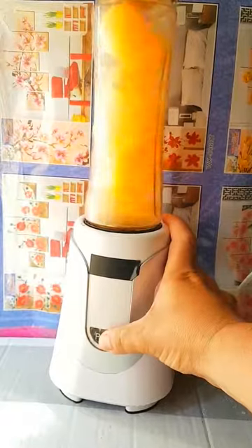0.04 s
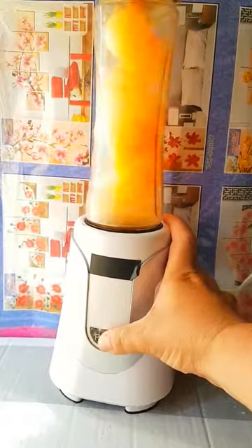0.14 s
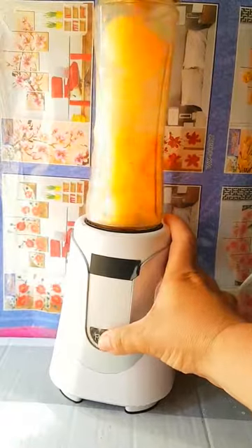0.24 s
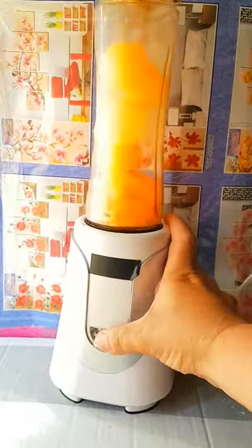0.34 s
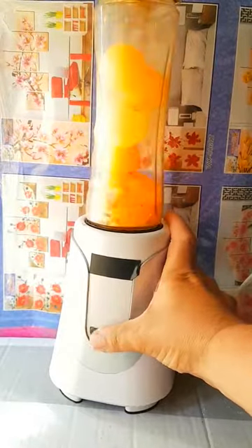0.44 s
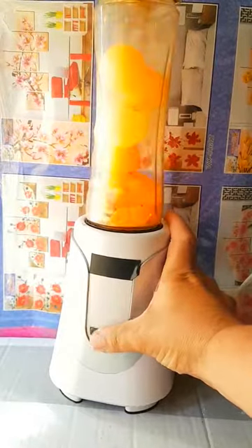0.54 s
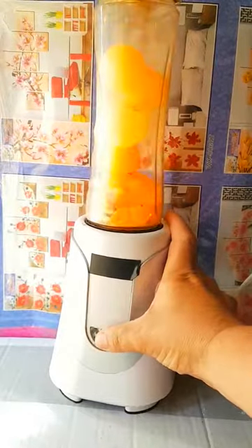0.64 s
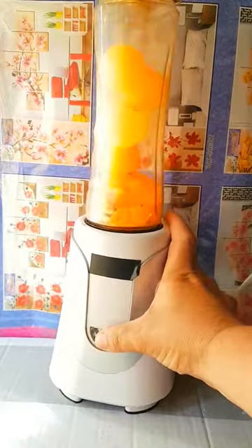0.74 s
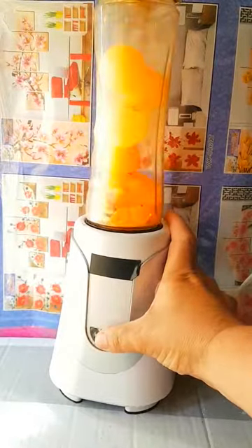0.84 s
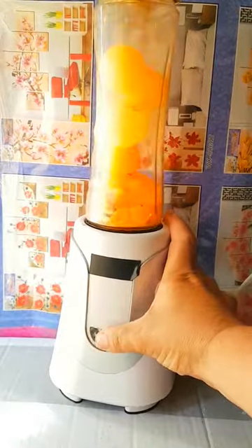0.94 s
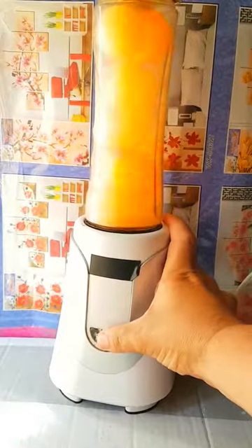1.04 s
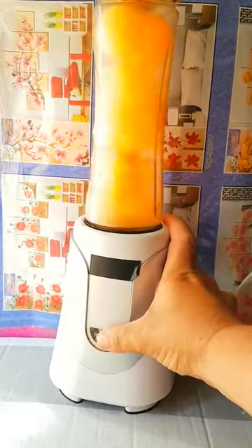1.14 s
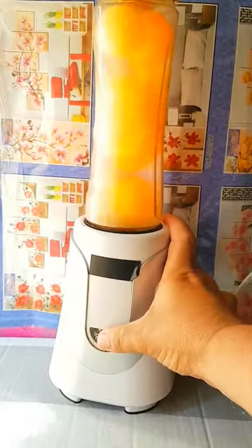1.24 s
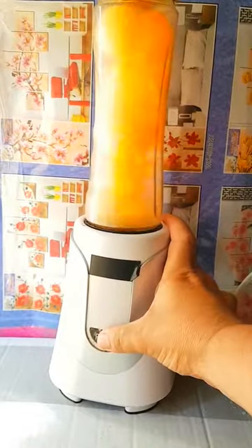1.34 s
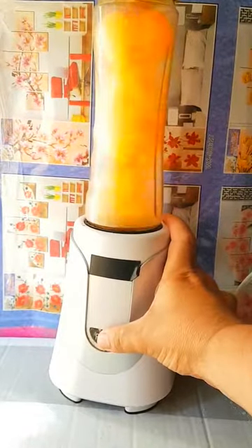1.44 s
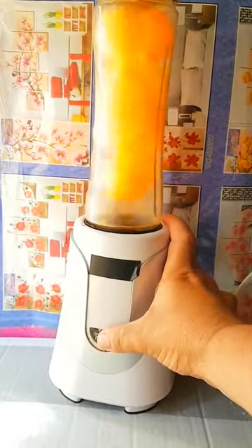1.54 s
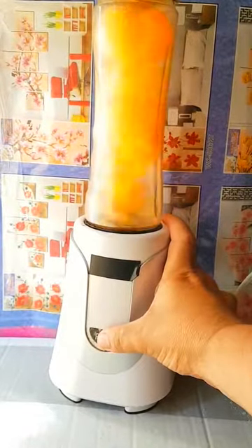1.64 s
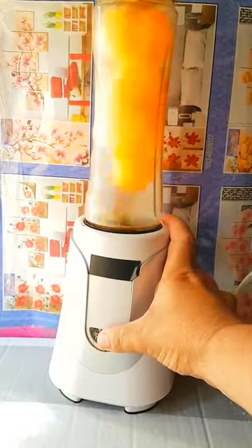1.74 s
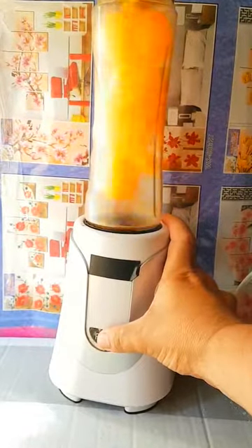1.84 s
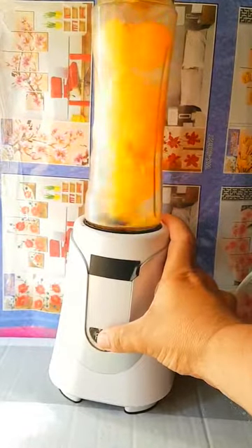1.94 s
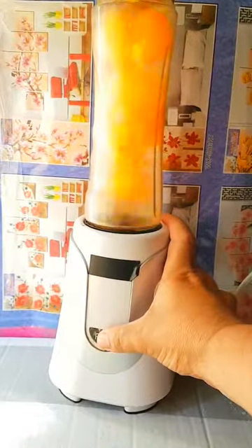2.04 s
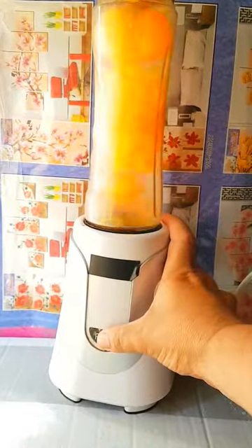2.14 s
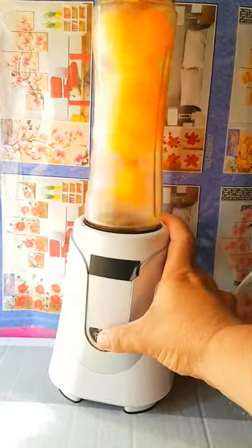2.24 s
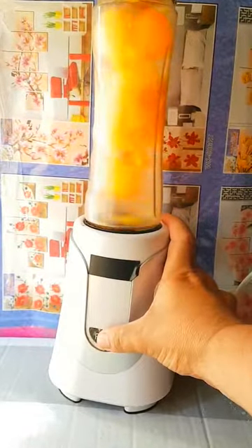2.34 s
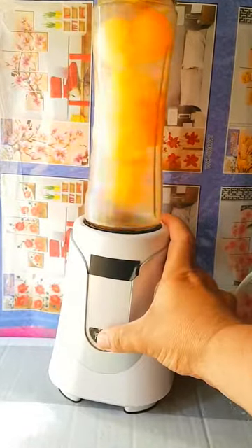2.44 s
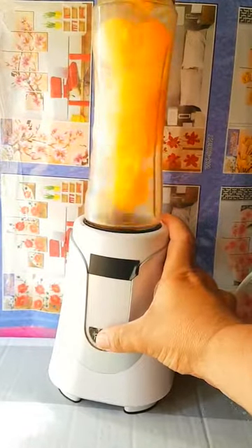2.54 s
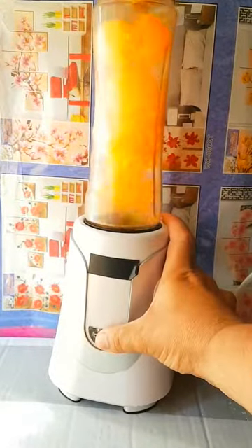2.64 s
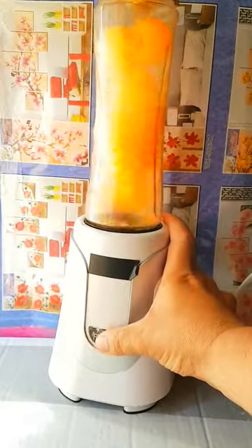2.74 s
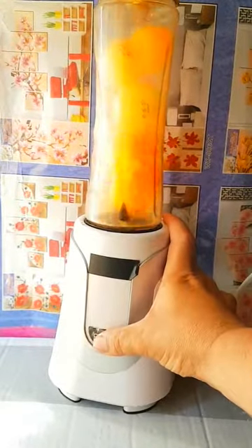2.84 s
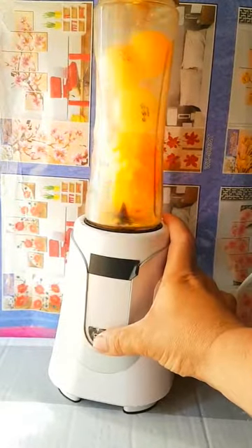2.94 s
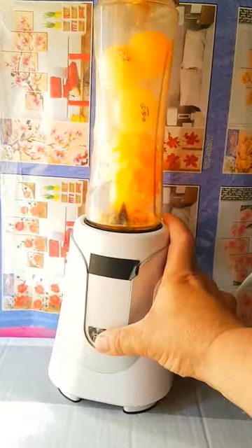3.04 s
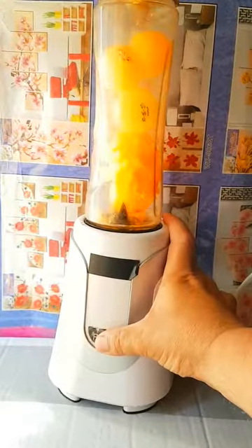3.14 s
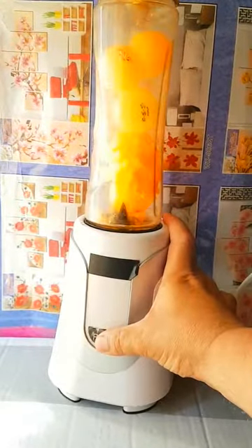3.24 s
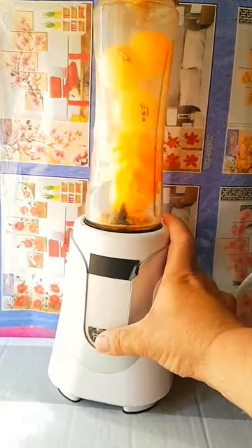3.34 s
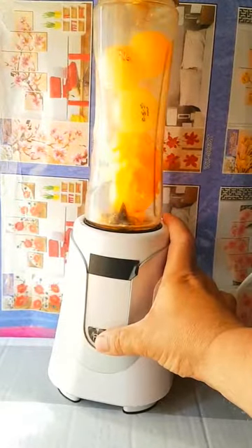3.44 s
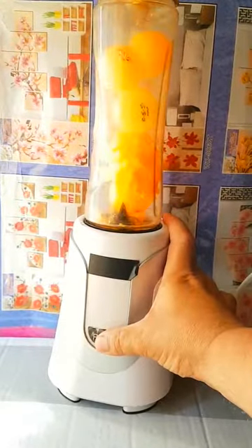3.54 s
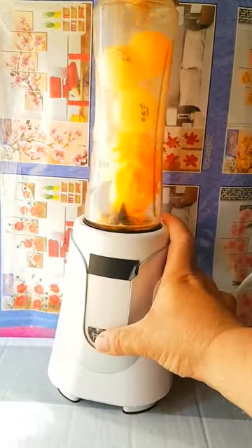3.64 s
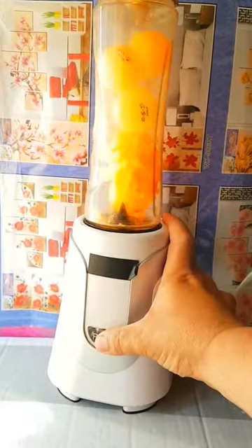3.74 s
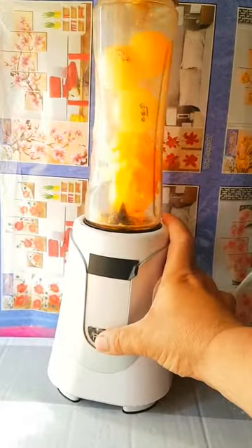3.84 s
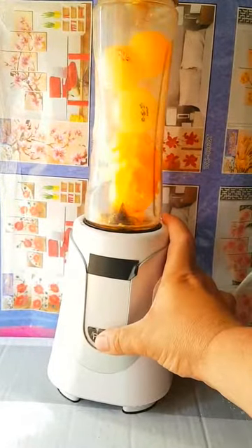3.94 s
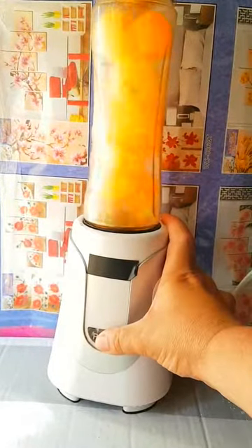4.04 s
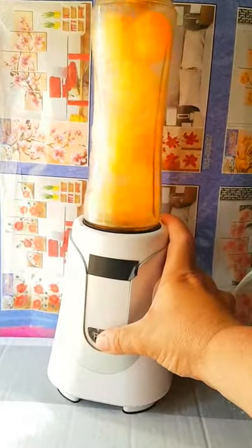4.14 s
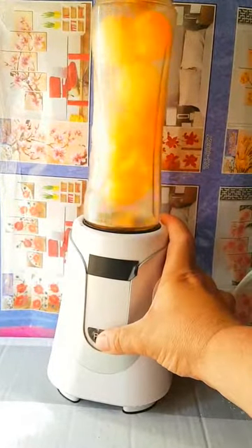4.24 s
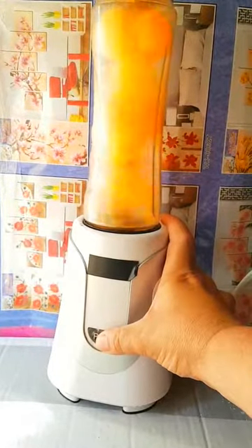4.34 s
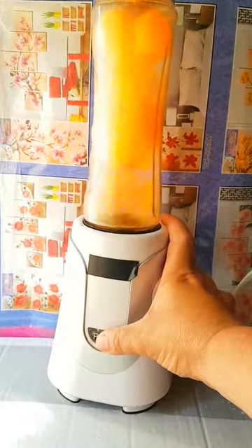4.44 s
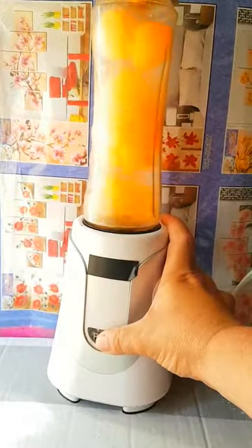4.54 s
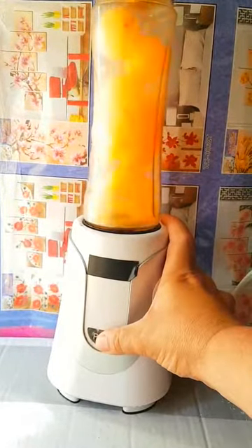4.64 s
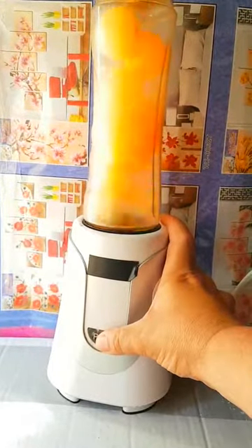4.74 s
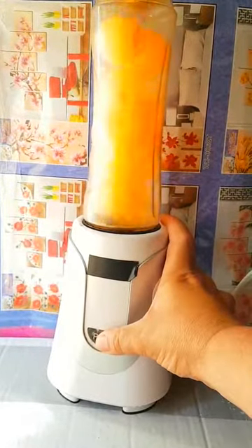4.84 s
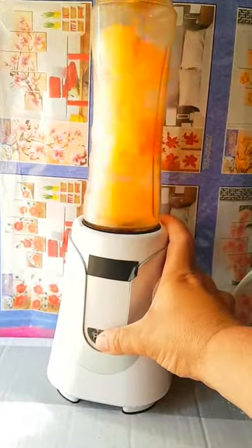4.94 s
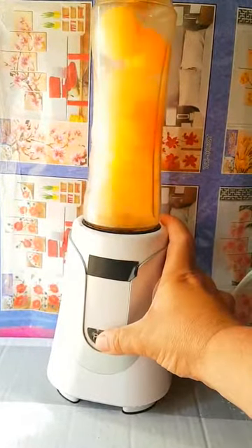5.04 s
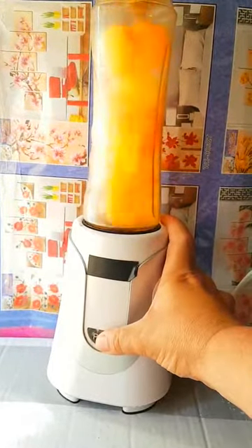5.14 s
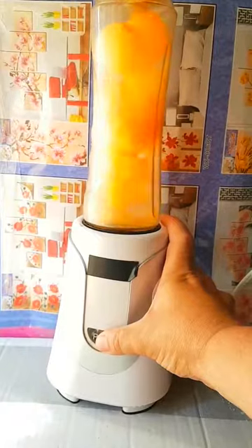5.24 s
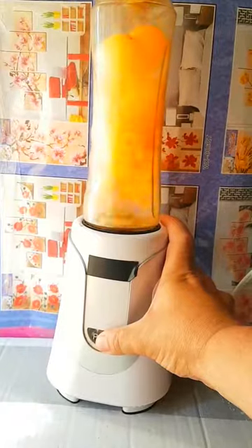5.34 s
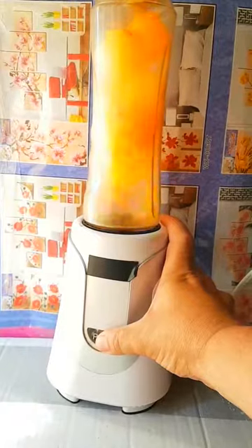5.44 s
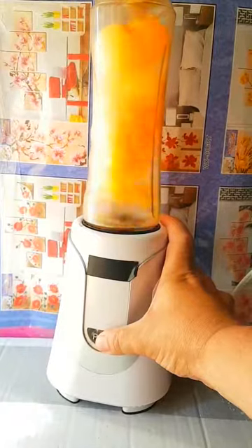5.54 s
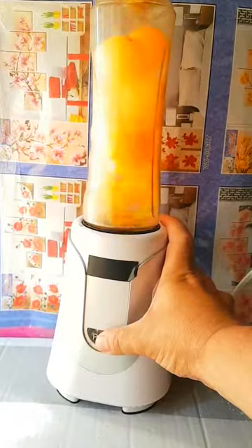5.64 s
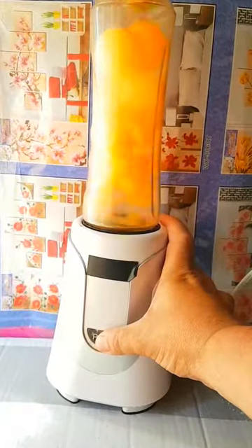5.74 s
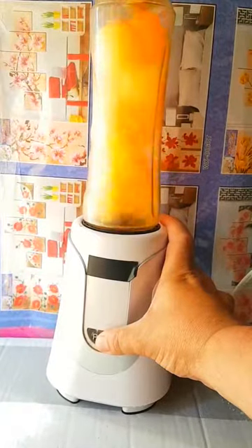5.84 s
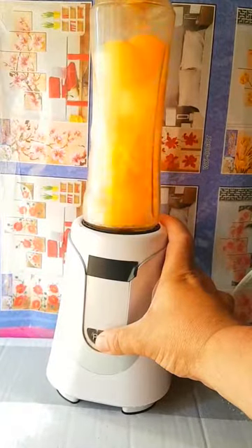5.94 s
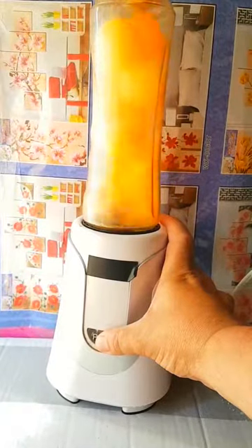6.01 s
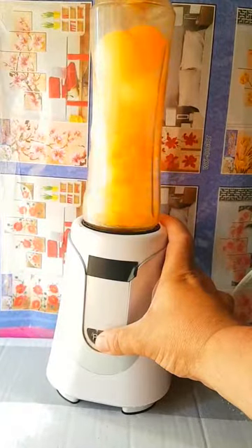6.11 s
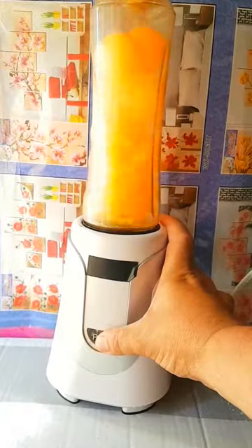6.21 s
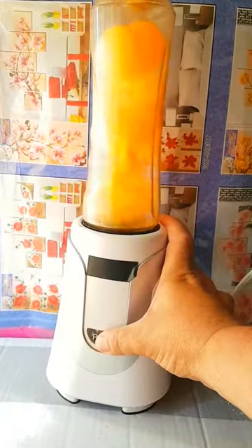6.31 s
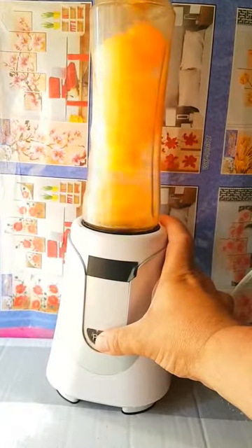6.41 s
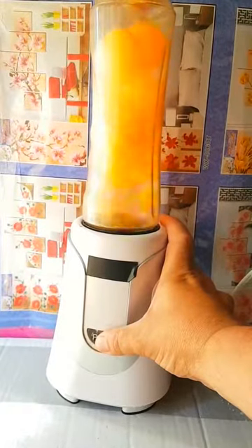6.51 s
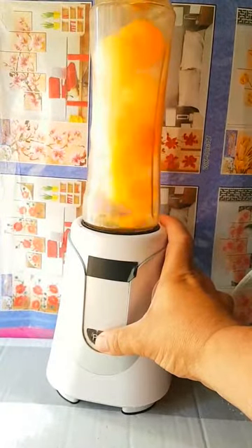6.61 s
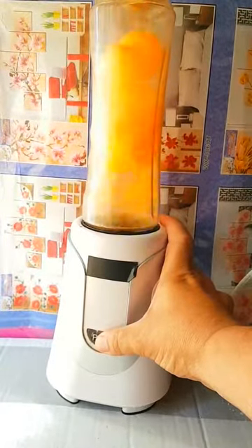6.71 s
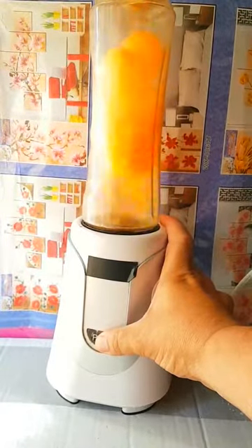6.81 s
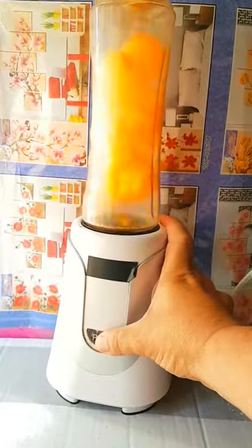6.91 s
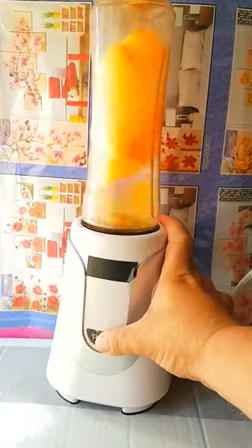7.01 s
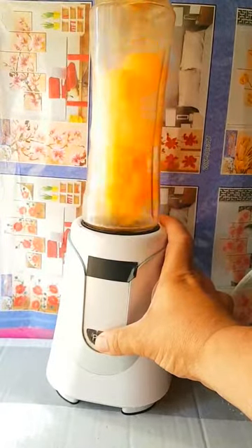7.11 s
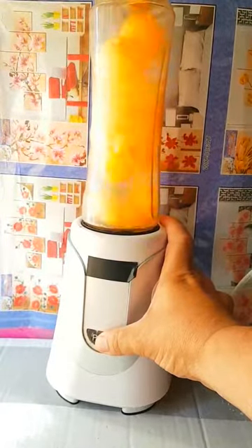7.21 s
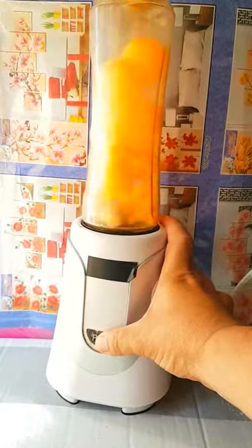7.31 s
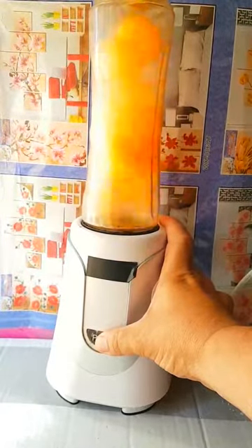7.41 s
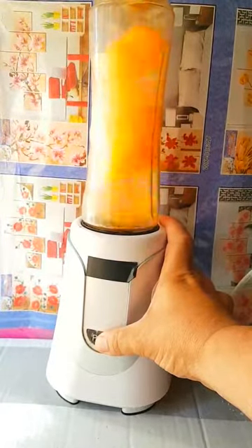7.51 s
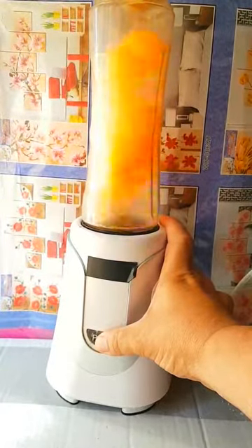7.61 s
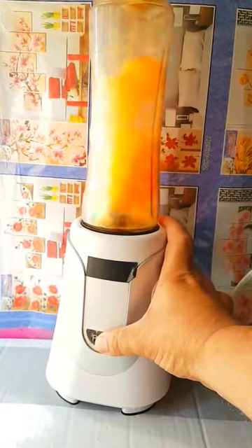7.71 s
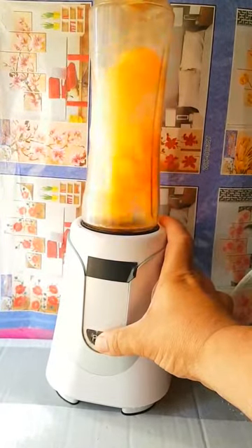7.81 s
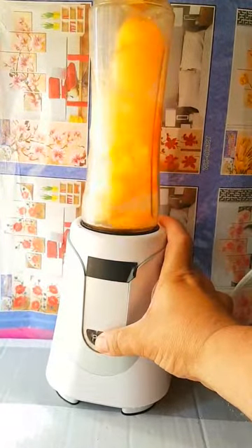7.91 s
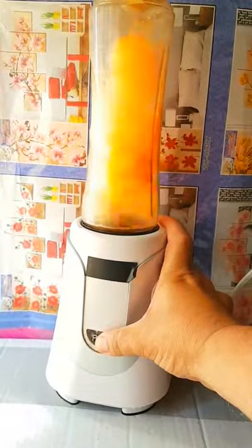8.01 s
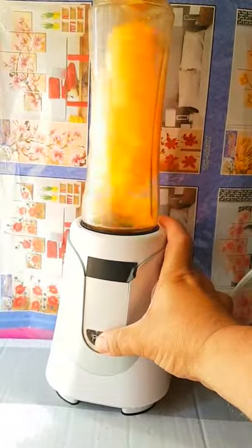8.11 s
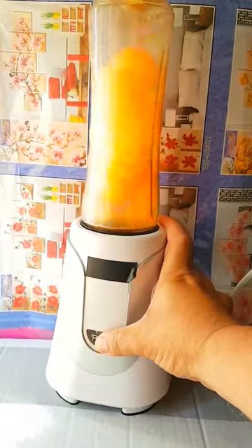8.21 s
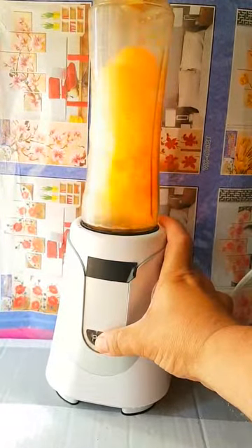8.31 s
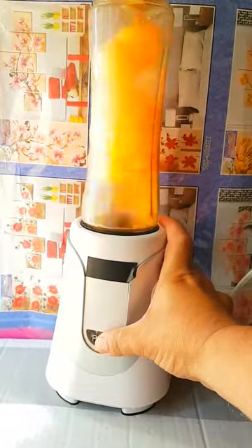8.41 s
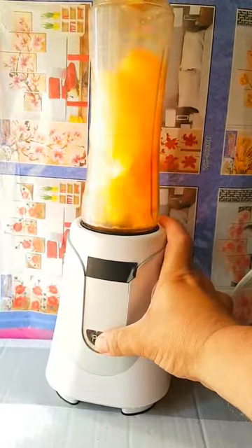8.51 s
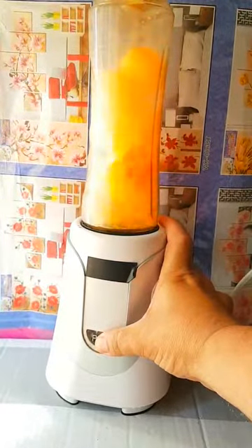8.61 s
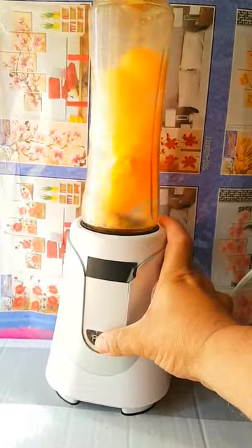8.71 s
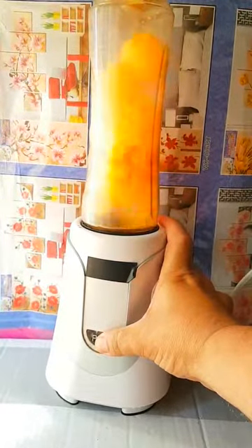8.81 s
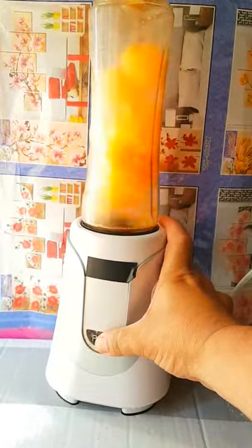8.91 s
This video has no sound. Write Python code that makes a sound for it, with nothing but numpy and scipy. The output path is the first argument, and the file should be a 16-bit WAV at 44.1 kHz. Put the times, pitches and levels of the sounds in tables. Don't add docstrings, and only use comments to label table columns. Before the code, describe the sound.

Hard plastic balls clatter loudly in a small motor-driven jar, stopping almost at once, then returning in longer, nearly unbroken rattling runs.

```python
import sys
import numpy as np
from scipy import signal
from scipy.fft import rfft, irfft
from scipy.io import wavfile
from scipy.ndimage import uniform_filter1d

SR = 44100
rng = np.random.default_rng(int(sys.argv[2]) if len(sys.argv) > 2 else 0)


def waveform_to_disk(signal):
    frames = np.transpose(np.atleast_2d(signal))
    scaled = np.clip(frames, -1, 1) * 32767
    samples = np.round(scaled).astype(np.int16)
    wavfile.write(sys.argv[1], SR, samples)


def boost_factor(decibels):
    exponent = np.asarray(decibels, float) / 20
    return 10 ** exponent


N = 395136


def ring(x, hz, width_hz):
    return signal.lfilter(*signal.iirpeak(hz, hz / width_hz, fs=SR), x)


def butter(x, order, hz, kind="low"):
    return signal.sosfilt(signal.butter(order, hz, kind, fs=SR, output="sos"), x)


def colour(x, points, unit=True):
    hz, db = np.transpose(points)
    bins_hz = np.fft.rfftfreq(4096, 1 / SR)
    gain = boost_factor(np.interp(np.log(bins_hz + 1), np.log(hz), db))
    if unit:
        gain = gain / np.sqrt(np.mean(gain ** 2))
    cepstrum = irfft(np.log(gain))
    cepstrum[1:2048] *= 2
    cepstrum[2049:] = 0
    response = irfft(np.exp(rfft(cepstrum)))
    return signal.oaconvolve(x, response[None], axes=1)[:, :N]


def train(s, size):
    at = np.clip((s * SR).astype(int), 0, N - 1)
    return np.array([np.bincount(at, channel, N) for channel in size])


def fade(x, t60_s):
    return signal.lfilter([1], [1, -np.exp(-np.log(1000) / (t60_s * SR))], x)


def swell(t, start, end, rise_db_s, sag_db_s, fall_db_s):
    t, start, end = t[None], start[:, None], end[:, None]
    rise = rise_db_s * np.maximum(start - t, 0)
    sag = sag_db_s * np.clip(t - start, 0, end - start)
    fall = fall_db_s * np.maximum(t - end, 0)
    return -rise - sag - fall


# on in seconds, off in seconds, idle rattle in dB.
RUNS = [
    (0, 0.226, -22),
    (1.087, 2.802, -42.5),
    (4.413, 5.42, -24),
    (5.424, 7.38, -24.5),
    (7.405, 8.953, -25.5),
]
# start in
# seconds, length in seconds, level in dB, share of the jar's air mode in dB.
THROWS = [(0, 0.22, -15.5, -9), (0.279, 0.038, -29, -12), (0.405, 0.15, -61.5, -9),
          (0.588, 0.0085, -62.5, -3.5), (1.084, 0.011, -21, -17.5), (1.109, 0.22, -11, -14),
          (1.307, 0.35, -11, -9), (1.713, 0.027, -28.5, -15.5), (1.746, 0.084, -14.5, -9.5),
          (1.91, 0.19, -28, -17.5), (2.12, 0.044, -11.5, -10.5), (2.252, 0.25, -14, -9),
          (2.558, 0.031, -18, -10), (2.678, 0.071, -14.5, -11), (2.831, 0.033, -30.5, -18),
          (2.953, 0.18, -62, -23),
          (4.082, 0.018, -27, -15), (4.102, 0.088, -13.5, -18.5), (4.186, 0.13, -11.5, -9),
               (4.438, .3, -11.5, -20.5), (4.824, 0.034, -10.5, -14), (4.977, .04, -28, -34),
               (5.063, 0.11, -13, -18), (5.283, 0.097, -17.5, -18.5), (5.421, 0.2, -15.5, -17.5),
               (5.764, 0.054, -28, -11), (5.855, 0.045, -22.5, -12), (5.923, 0.027, -17.5, -7),
               (6.052, 0.18, -19.5, -15), (6.25, 0.1, -20.5, -20), (6.449, 0.14, -15, -11.5),
               (6.664, 0.025, -11.5, -15), (6.758, 0.21, -14, -19.5), (7.051, 0.056, -16.5, -18),
               (7.247, 0.17, -24, -32), (7.477, 0.24, -14.5, -18), (7.977, 0.015, -23, -17),
               (8.057, 0.036, -19, -17), (8.146, 0.018, -17.5, -4), (8.328, 0.019, -18.5, -18),
               (8.437, 0.074, -19, -20), (8.646, 0.017, -20.5, -17), (8.748, 0.022, -21.5, -22),
               (8.87, 0.026, -23.5, -12), (8.926, .04, -19, -25)]
RISE_DB_S, SAG_DB_S, FALL_DB_S, COAST_DB_S = 4000, 15, 297.5, 167
IDLE_AIR_DB = -13.5


def churn(s):
    start, length, db, air_db = np.transpose(THROWS)
    throw_db = db[:, None] + swell(s, start, start + length, RISE_DB_S, SAG_DB_S, FALL_DB_S)
    throws = boost_factor(2 * throw_db)
    on, off, run_db = np.transpose(RUNS)
    idle_db = run_db[:, None] + swell(s, on, off, RISE_DB_S, 0, COAST_DB_S)
    idle = boost_factor(2 * idle_db).sum(axis=0)
    power = throws.sum(axis=0) + idle + 1e-30
    return 10 * np.log10(power), (air_db @ throws + IDLE_AIR_DB * idle) / power


# start in seconds,
# peak in dB, treble share in dB.
BLOWS = [(0.053, -12, -13), (0.089, -17, -15.5), (0.141, -15.5, -10.5), (1.089, -3.5, -19),
         (1.112, -10, -10), (1.293, -3, -13), (1.369, -4, -24), (1.435, -15, -20), (1.463, -5.5, -28),
         (1.502, -5.5, -31), (1.568, -4, -20), (1.624, -1, -34.5), (1.706, -8, -9.5),
         (1.733, -18, -11), (1.752, 1.5, -36.5), (1.832, -4, -24.5), (1.905, -8.5, -19.5),
         (2.114, -5, -18.5), (2.256, -2, -23.5), (2.304, -10.5, -26.5), (2.376, -4.5, -26),
         (2.417, -12, -17), (2.475, -29, -27.5), (2.495, -4, -21.5), (2.556, -9, -25.5),
         (2.589, -8.5, -22), (2.679, -9.5, -16), (2.774, -7, -17), (3.023, -44, -3.5),
         (3.117, -62, 1),
         (4.092, -9, -19.5), (4.129, -6, -20), (4.182, -2.5, -20), (4.266, -12, -17),
               (4.444, -15, -20), (4.481, -8, -18), (4.559, -5, -16), (4.642, -37, -16.5),
               (4.68, -4.5, -16), (4.714, -6.5, -18), (4.79, -9.5, -12.5), (4.826, -16, -19),
               (4.983, -8.5, -10), (5.022, -7.5, -16), (5.061, -6.5, -18), (5.282, -5, -12),
               (5.351, -5, -16), (5.432, -12, -12.5), (5.5, -0.5, -18), (5.534, -4, -13),
               (5.597, -4.5, -13.5), (5.766, -7.5, -10), (5.854, -10, -10.5), (6.128, -6, -12),
               (6.269, -9.5, -11.5), (6.313, -13, -5.5), (6.35, -4.5, -14), (6.39, -4.5, -10),
               (6.42, -4, -11), (6.452, -4, -14.5),
         (6.538, -3.5, -14), (6.626, -8, -5), (6.665, -21, -16), (6.765, -2.5, -16.5),
              (6.818, -26, -11.5), (6.896, -12.5, -12), (6.943, -12.5, -11.5), (7.051, -5, -14.5),
              (7.115, -8.5, -13), (7.149, -11.5, -11), (7.246, -7, -16.5), (7.291, -1.5, -11),
              (7.362, -7, -13), (7.476, -7.5, -12), (7.621, -15, -17.5), (7.667, -10.5, -12),
              (7.692, -9, -11.5), (7.761, -19, -11.5), (7.978, -6, -9), (8.056, -15.5, -8.5),
              (8.146, -6, -14.5), (8.292, -9.5, -10.5), (8.342, -10, -11), (8.407, -24, -18),
              (8.439, -4, -9), (8.522, -6, -11.5), (8.589, -10, -12.5), (8.651, -9.5, -11.5),
              (8.75, -6.5, -8.5), (8.841, -13, -13)]
KNOCKS_A_SECOND = 700


def knocks():
    when, luck = rng.random((int(KNOCKS_A_SECOND * N / SR), 2)).T
    s = when * N / SR
    spread = boost_factor(np.minimum(-2.8 * np.log(1 - luck), 8))
    hail = boost_factor(churn(s)[0] - 3) * spread
    hail = hail * np.sqrt(SR / KNOCKS_A_SECOND / np.mean(spread ** 2))

    at, peak_db, treble_db = np.transpose(BLOWS)
    late_s = rng.exponential(size=(len(at), 12)) * 0.009
    late_s[:, :4] *= 0.1
    blows = boost_factor(peak_db[:, None] + 5.5 - 57 * late_s)
    hail_treble_db = np.interp(s, at, treble_db)
    treble = boost_factor(np.r_[hail_treble_db, np.repeat(treble_db, late_s.shape[1])] + 12)
    return np.r_[s, (at[:, None] + late_s).ravel()], np.r_[hail, blows.ravel()], treble


# frequency in Hz, level in dB per Hz.
CRACK = [(25, -45), (60, -33.5), (200, -31.5), (300, -6), (400, -9.5), (900, -6), (1060, -9), (1300, -2.5),
         (2100, -5.5), (4200, -9.5), (7900, -14), (8700, -26.5), (11500, -26), (15500, -27), (16500, -21)]


def crack(s, size, t60_s, click_db):
    power = fade(train(s, [size ** 2]), t60_s) * np.log(1000) / (t60_s * SR)
    burst = np.sqrt(power) * rng.standard_normal((2, N))
    click = boost_factor(click_db) * train(s, size * rng.standard_normal((len(s), 2)).T)
    return colour(click + burst, CRACK)


# frequency in Hz, width in Hz, level in dB.
JAR = [(325, 10, 5), (380, 16, 3), (416, 30, 1.5), (506, 30, -4), (625, 45, -6), (757, 28, -4),
       (870, 45, -8), (935, 40, -6), (1252, 60, -8), (1387, 55, -6), (1510, 60, -8), (1765, 55, -3),
       (2003, 55, 2), (2312, 70, -6), (2500, 60, -8), (2682, 70, -6), (2850, 70, -9), (3146, 55, -6),
       (3550, 70, -10), (3935, 70, -11), (4970, 300, -13)]
# time in seconds, favoured pitch in Hz.
STRUCK = [
    [(1.1, 2680), (1.216, 2170), (1.26, 2310), (1.294, 1960), (2.528, 2027), (2.61, 2380), (2.746, 2070),
     (2.79, 2660), (2.85, 2350)],
    [(4.1, 2020), (4.35, 1940), (4.96, 2350), (5.03, 2000), (5.39, 2440), (5.43, 2110), (6.24, 2190),
     (6.26, 2420), (6.5, 1960)],
    [(6.52, 1980), (6.69, 2270), (8.03, 2360), (8.22, 2010), (8.29, 2500), (8.38, 1960), (8.43, 2600),
     (8.57, 2100), (8.94, 2350)],
]
STRUCK_DB, STRUCK_OCTAVES = 2, 0.61
WALL_DB, WALL_TILT = -12, 0.68


def rattle():
    s, size, treble = knocks()
    level_db, air_db = churn(s)
    wall_db = WALL_DB - WALL_TILT * np.clip(level_db + 20, -6, 10)
    struck_hz = np.interp(s, *np.concatenate(STRUCK).T)
    clump_s = np.arange(0, N / SR + 1, 0.035)
    jar, power = 0, 0
    for hz, width_hz, db in JAR:
        drive_db = 0
        if hz < 350:
            drive_db = air_db + 12.5
        elif hz < 450:
            drive_db = wall_db + 10
        favour_db = 2.3 * np.interp(s, clump_s, rng.standard_normal(len(clump_s)))
        if hz > 1200:
            octaves = np.log2(hz / struck_hz)
            favour_db += STRUCK_DB * (np.exp(-(octaves / STRUCK_OCTAVES) ** 2) - 0.5)
        push = size * boost_factor(db + drive_db + favour_db) * rng.standard_normal((len(s), 2)).T
        if hz > 3000:
            push = push * treble ** 0.17
        jar = jar + ring(train(s, push), hz, width_hz)
        power += np.pi * width_hz / SR * boost_factor(2 * db)
    body = butter(crack(s, size, t60_s=0.055, click_db=-10.5), 2, 3300)
    snap = butter(crack(s, size * treble, t60_s=0.018, click_db=-12.5), 2, 3300, "high")
    return boost_factor(-1) * jar / np.sqrt(power) + boost_factor(-3) * body + boost_factor(-2.5) * snap


# start in seconds, peak in dB, pitch in Hz.
CLACKS = [(1.305, -22, 3090), (1.552, -16, 2680), (1.675, -14.5, 4220), (1.7388, -13, 2250),
          (1.8418, -14, 2330), (1.945, -27, 3230), (1.9959, -26, 5270), (2.0524, -25, 2600),
          (2.3092, -17, 2310), (2.386, -15, 2280), (2.815, -30, 2260), (2.8514, -24, 2830),
          (3.0424, -50, 3190), (4.115, -11, 3550), (4.1979, -9, 2700), (4.2492, -26, 2300),
          (4.6728, -18, 2730), (4.8453, -20, 3110), (4.8814, -11, 3680), (5.0861, -8, 2600),
          (5.2495, -16.5, 2870), (5.3582, -4.5, 2780), (5.468, -12, 2320), (5.679, -13.5, 2730),
          (5.8395, -12.5, 2640), (6.052, -12.5, 4080), (6.0856, -10.5, 2640), (6.1186, -14, 2300),
          (6.213, -23, 2320), (6.2507, -10.5, 5110), (6.28, -7, 2690), (6.4245, -12, 2300),
          (6.5284, -11.5, 2800), (6.6737, -13, 2260), (6.835, -18, 2680), (6.8553, -9, 2560),
          (6.9235, -12, 2630), (7.2315, -16.5, 2750), (7.2709, -11, 2520), (7.6311, -9, 2870),
          (7.7124, -11, 2720), (7.7625, -7, 2310), (7.8262, -21, 2690), (7.9606, -27, 3140),
          (7.9756, -18, 2630), (7.997, -14, 2630), (8.0476, -15, 2480), (8.133, -19, 2600),
          (8.1733, -12.5, 4930), (8.2649, -19, 2330), (8.3308, -19, 3960), (8.4083, -12, 2790),
          (8.4755, -9, 2680), (8.6376, -15.5, 2680), (8.7613, -6.5, 4980), (8.8657, -16, 3000),
          (8.8722, -10.5, 3070), (8.9266, -11, 2700), (8.9498, -9, 2510)]
CLACK_T60_S, SHELL_T60_S = 0.045, 0.06
CLACK_DB, SHELL_DB, BODY_DB = -4, 7.5, -6.5


def clacks():
    burst, shell = np.zeros((2, 2, N + SR))
    t = np.arange(SR // 10) / SR
    for s, db, hz in CLACKS:
        span = slice(int(s * SR), int(s * SR) + len(t))
        hiss, strike = rng.standard_normal((2, 2, len(t)))
        burst[:, span] += hiss * boost_factor(db - 60 * t / CLACK_T60_S)
        shell[:, span] += ring(strike, hz, hz / 9) * boost_factor(db - 60 * t / SHELL_T60_S)
    burst = colour(burst[:, :N], CRACK)
    body = butter(burst, 1, 2500)
    bright = burst - (1 - boost_factor(BODY_DB)) * body
    return boost_factor(CLACK_DB) * (bright + boost_factor(SHELL_DB) * shell[:, :N])


def whine(tables, wobble, overtone_db):
    out, t = np.zeros(N), np.arange(N) / SR
    drift, flutter = uniform_filter1d(rng.standard_normal((2, N)), size=1200) * 35
    for table in tables:
        s, hz, db = np.transpose(table)
        edge = np.clip(np.minimum(t - s[0] + 0.03, s[-1] + 0.03 - t) / 0.03, 0, 1)
        on = edge > 0
        pitch_hz = np.interp(t[on], s, hz) * (1 + wobble * drift[on])
        phase = 2 * np.pi * np.cumsum(pitch_hz) / SR
        tone = np.sin(phase) + boost_factor(overtone_db) * np.sin(2 * phase)
        level = boost_factor(np.interp(t[on], s, db) + 1.7 * flutter[on] - 1)
        out[on] += np.sqrt(2) * edge[on] * level * tone
    return out


# start in seconds, end in seconds, start pitch
# in Hz,
SPINS = [(1.853, 2.12, 189.5, 281, -50), (4.358, 4.62, 209, 294, -50), (4.93, 5.115, 234, 243, -49.5),
         (5.185, 5.55, 246, 235.5, -44.5), (5.633, 6.417, 228.4, 283.6, -36), (6.555, 6.81, 246, 255, -35),
         (6.903, 7.3, 222, 260, -39.5), (7.376, 7.506, 234, 295, -38), (7.542, 7.74, 241, 251, -39),
         (7.792, 8.13, 263, 277, -36.5), (8.139, 8.93, 250.4, 284.5, -35)]
SPIN_UP_S = 0.099


def shaft():
    share = np.linspace(0, 1, 12)
    spins = []
    for start, end, braked_hz, free_hz, db in SPINS:
        age_s = (end - start) * share
        hz = free_hz - (free_hz - braked_hz) * np.exp(-age_s / SPIN_UP_S)
        spins.append(np.transpose([start + age_s, hz, np.full(len(share), db)]))
    return whine(spins, wobble=0.005, overtone_db=-12.5)


# time in seconds, pitch in Hz, level in dB.
HUMS = [
    [(0.0, 113, -38), (0.216, 122, -36), (0.45, 115, -65.5)],
    [(0.52, 120.5, -73), (0.594, 119, -58), (0.7, 121.5, -77.5)],
    [(1.08, 124.5, -61), (1.276, 128.4, -39.5), (1.5, 126, -61)],
]
# time in seconds, pitch in Hz, level in dB.
DRONE = [
    [(3.04, 3230, -72), (3.11, 3160, -69)],
    [(.65, 184, -86.5), (.79, 190, -82.5), (.9, 186.6, -92.5)],
    [(3.1, 205, -88), (3.2, 205.4, -72), (3.55, 202.6, -82), (3.65, 197, -79.5), (4.0, 200, -83.5)],
]


def hum():
    coils = whine(HUMS, wobble=0.011, overtone_db=-21)
    return coils + whine(DRONE, wobble=0.0133, overtone_db=-25)


# start in seconds, peak in dB, pitch in Hz, t60 in seconds.
TICKS = [(0.595, -48, 2740, 0.054), (0.77, -60, 2590, 0.043), (0.794, -67, 4850, 0.043),
         (0.841, -63, 337, 0.062), (0.959, -51, 520, 0.09), (3.238, -60.5, 4080, 0.041),
         (3.292, -43.5, 316, 0.064), (3.338, -47, 319, 0.075), (3.454, -65, 6500, 0.03),
         (3.796, -48, 504, 0.073), (3.902, -36, 420, 0.084), (4.034, -35, 519, 0.19)]


def ticks():
    out, t = np.zeros((2, N + SR)), np.arange(SR // 5) / SR
    for s, db, hz, t60_s in TICKS:
        band_hz = (250, 1300) if hz < 900 else (hz / 2, 9000)
        click = rng.standard_normal((2, len(t))) * boost_factor(-60 * t / 0.025)
        click = butter(click, 2, band_hz, "band")
        tone = ring(rng.standard_normal(len(t)), hz, hz / 6) * boost_factor(13.5 - 60 * t / max(t60_s, 0.01))
        out[:, int(s * SR):][:, :len(t)] += boost_factor(db) * (click + tone)
    return out[:, :N]


# time in seconds, level in dB.
RUB = [
    [(.8, -79), (.97, -79), (1.07, -73)],
    [(3.3, -87), (3.45, -72), (3.6, -68), (3.8, -71.5), (3.95, -71), (4.07, -72)],
]
# frequency in Hz, width in Hz, level in dB.
RUB_MODES = [(504, 120, 6), (705, 300, 3.5), (945, 170, -7), (1800, 300, 1.5), (2900, 1000, -23),
             (4750, 350, -26.5)]


def rub():
    skin = rng.standard_normal((2, N))
    sound = sum(boost_factor(db) * ring(skin, hz, width_hz) for hz, width_hz, db in RUB_MODES)
    t, level = np.arange(N) / SR, 0
    for run in RUB:
        s, db = np.transpose(run)
        level = level + np.interp(t, s, boost_factor(db), left=0, right=0)
    return sound / np.std(sound) * level


# time in seconds, left level in dB, right level in dB.
POPS = [(2.147, -23.5, -38), (5.375, -20, -26), (5.86, -12, -38), (6.394, -42, -24), (6.546, -44, -24),
        (6.682, -17, -8.5), (6.84, -14, -43), (6.863, -17, -30), (7.299, -10, -6.5), (7.5, -66, -44),
        (7.768, -12.5, -60), (8.349, -46, -25), (8.764, -31, -9.5), (8.902, -35, -30), (8.932, -49, -36),
        (8.951, -18, -28)]


def pops():
    s, left_db, right_db = np.transpose(POPS)
    t = np.arange(-SR // 50, SR // 50) / SR
    push = np.exp(-((t + 0.00212) / 0.00063) ** 2)
    rebound = 0.34 * np.exp(-((t - 0.002) / 0.00155) ** 2)
    puffs = train(s, boost_factor(np.array([left_db, right_db]) + 1))
    return signal.oaconvolve(puffs, (push - rebound)[None], mode="same", axes=1)


# start in seconds, end in seconds, level in dB.
DRAUGHT = [
    (0, 0.095, -44),
    (1.206, 2.6, -66.5),
    (4.19, 5.3, -58),
    (5.5, 8.96, -47.5),
]
DRAUGHT_RISE_DB_S, DRAUGHT_FALL_DB_S = 92, 41.5


def draught():
    start, end, db = np.transpose(DRAUGHT)
    shape_db = swell(np.arange(N) / SR, start, end, DRAUGHT_RISE_DB_S, 0, DRAUGHT_FALL_DB_S)
    level = boost_factor(db) @ boost_factor(shape_db)
    gust = uniform_filter1d(rng.standard_normal((2, N)), size=1500) * 40
    air = ring(ring(rng.standard_normal((2, N)), 120, 160), 120, 160)
    return air / np.std(air) * level * boost_factor(-1 + 5.4 * gust)


# frequency in Hz, level in dB.
APART = [(60, 1.5), (200, -7), (380, -10), (700, -2.5), (1290, 1.5), (2380, -1), (4400, 1), (8120, 4),
         (15000, 3)]
# frequency in Hz, level in dB.
LEFT_PORT = [(60, -1.5), (125, -4.5), (250, -4), (500, -1.5), (1000, 0), (2000, -3), (4000, -1), (8000, -1),
             (14000, 3.5)]


def ports(x):
    t = np.arange(SR // 100) / SR
    echoes = rng.standard_normal(len(t)) * boost_factor(-60 * t / 0.063) * (t > 0)
    near = signal.oaconvolve(x[0], echoes / np.sqrt(np.sum(echoes ** 2)))[:N]
    near = butter(near, 1, 2000)
    side = colour([0.75 * near + 0.75 * x[1]], APART, unit=False)[0]
    left = colour([x[0] + side], LEFT_PORT, unit=False)[0]
    return np.array([left, x[0] - side]) * boost_factor(0.79)


# frequency in Hz, t60 in seconds.
ROOM_T60 = [(100, 1), (330, 0.37), (1000, 0.39), (4000, 0.15), (12000, 0.36)]


def room(x):
    t, tail = np.arange(int(0.6 * SR)) / SR, 0
    for hz, t60_s in ROOM_T60:
        tail = tail + ring(rng.standard_normal((2, len(t))), hz, hz * 0.52) * boost_factor(-60 * t / t60_s)
    tail = tail * np.clip(t / 0.0083, 0, 1)
    return signal.oaconvolve(x, tail / np.sqrt(np.sum(tail ** 2) / 2), axes=1)[:, :N]


# frequency in Hz, level in dB per Hz.
QUIET = [(20, -6), (45, -19), (100, -16.5), (220, -21.5), (800, -29.5), (1500, -35.5), (4000, -43),
         (9500, -49), (16000, -42)]


def floor():
    mid, side = colour(rng.standard_normal((2, N)), QUIET)
    return boost_factor(-70) * np.array([mid + 0.77 * side, mid - 0.7 * side])


def scene():
    blender = rattle() + clacks() + ticks() + rub()
    blender = blender + shaft() * np.array([[1], [0.3]])
    heard = ports(blender + boost_factor(-13.5) * room(blender))
    return heard + hum() + pops() + draught() + floor()


def low_pass(x):
    return signal.sosfilt(signal.butter(12, 15850, fs=SR, output="sos"), x)


def record(dry):
    thin = butter(dry, 1, 70, "high")
    soft = np.tanh(0.9 * thin) / 0.9
    cut = signal.sosfilt(signal.ellip(12, 0.3, 60, 15760, fs=SR, output="sos"), soft)
    return low_pass(cut)


dry = scene()
out = record(dry)
waveform_to_disk(out)
```